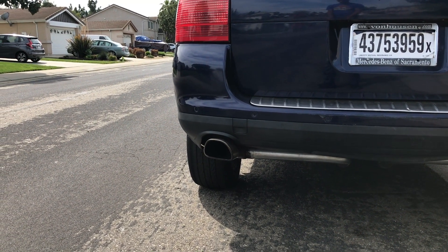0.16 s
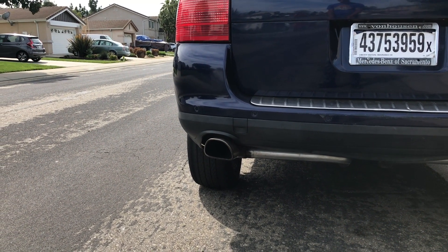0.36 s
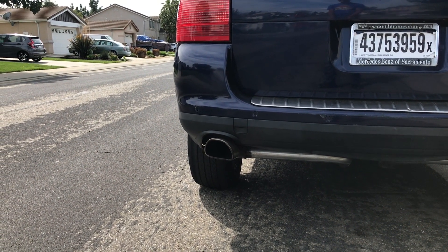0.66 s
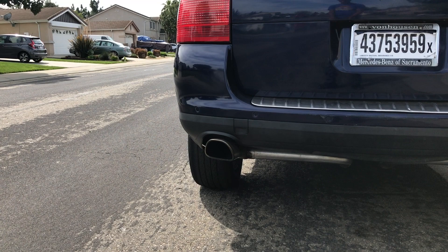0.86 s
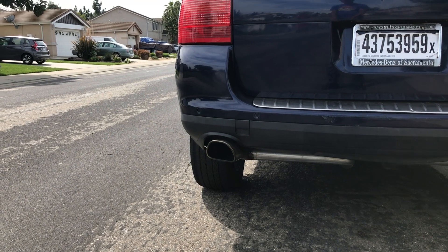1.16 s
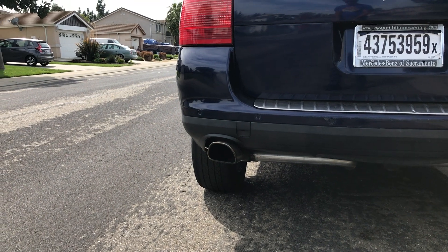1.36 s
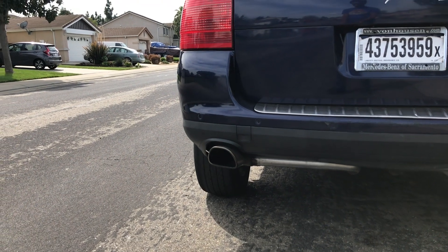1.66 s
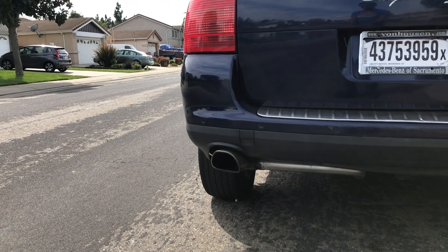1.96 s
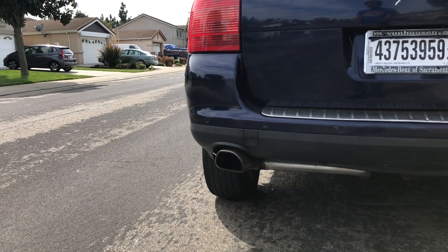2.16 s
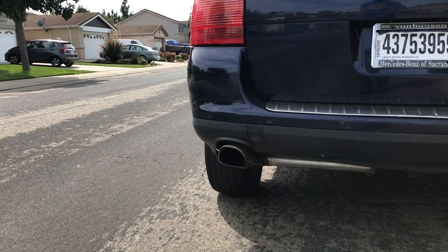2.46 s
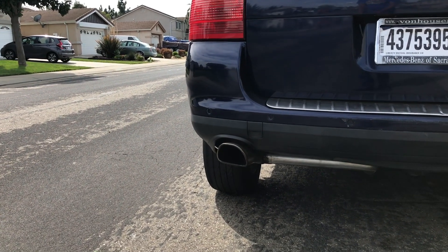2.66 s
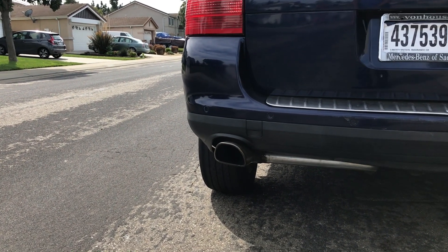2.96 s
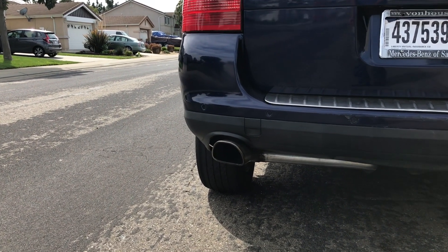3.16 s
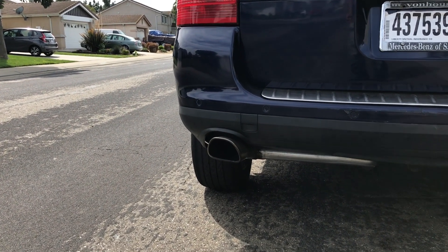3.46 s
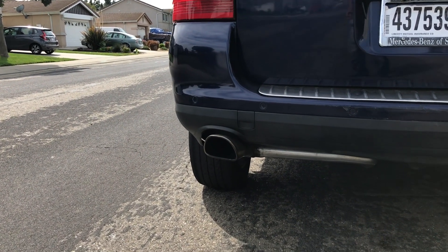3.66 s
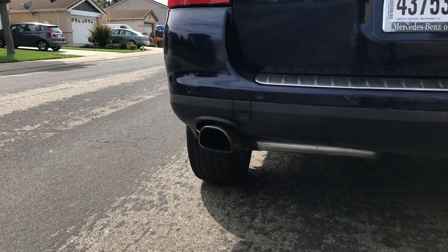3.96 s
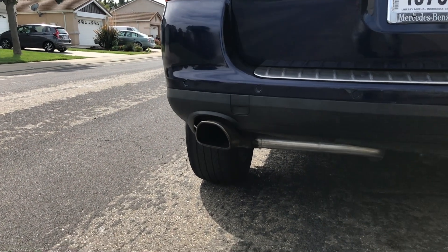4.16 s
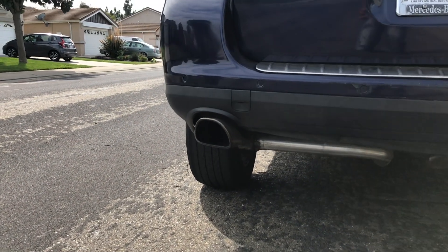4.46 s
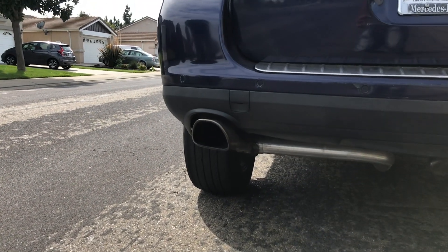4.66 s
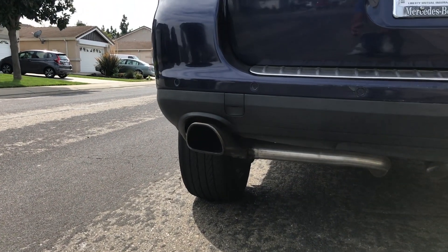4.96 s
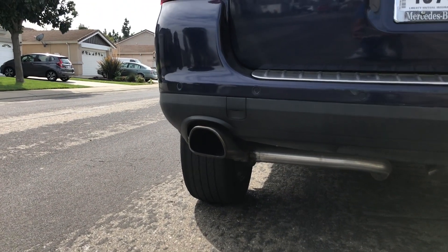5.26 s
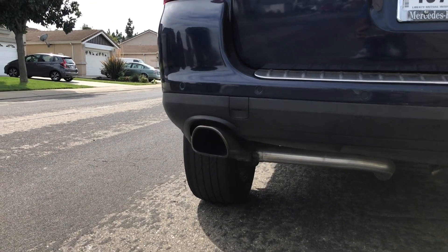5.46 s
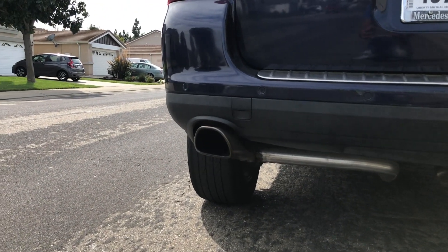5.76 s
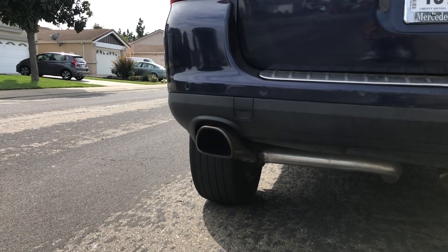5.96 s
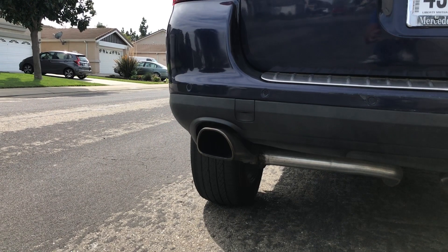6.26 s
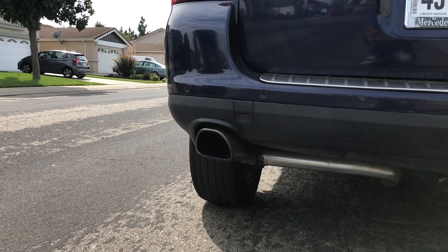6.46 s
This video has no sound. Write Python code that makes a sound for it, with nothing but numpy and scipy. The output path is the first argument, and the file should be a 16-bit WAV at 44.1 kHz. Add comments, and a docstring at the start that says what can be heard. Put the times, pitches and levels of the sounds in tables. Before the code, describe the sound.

A V8 with an open exhaust idles close to the microphone on a quiet street: a deep, uneven burbling drone, soft chuffing, engine-bay rush and ticking, and a thin high pump whine. A tiny air puff comes at 0.3 s. From 1.0 s the engine is revved, the drone climbing through booming pipe resonances into a hard metallic rasp, peaking near 1.8 s with a cluster of pops. It falls gradually, burbling, to a low rumble by 3.4 s. At 4.2 s a brief gust of gas begins a second, quicker rev, with a puff at 4.4 s. It peaks higher around 5.0-5.1 s, with thick crackling afterfires and loud bangs, then drops, hangs briefly at 5.6 s and slides down toward idle by 6.6 s. The microphone moves closer from about 4 s, making the final rasp and hiss more direct. Only a short, faint echo from houses.

```python
"""A V8 with an open exhaust idles and is revved twice, heard from just behind the tailpipe on a quiet street.
Even firing makes a deep drone that swells in the pipe's resonances; unequal cylinders make the pipe burble.
With speed and load the pulse fronts steepen into a rasp, and afterfires pop mostly around the two rev peaks.
Under this lie turbulent gas hiss, the rush and ticking of the engine bay, a thin pump whine and two air puffs.
Shaft speed sets the pace of the firings; speed and throttle load set the engine and exhaust levels."""
import sys
import numpy as np
from scipy import signal
from scipy.fft import rfft, irfft, next_fast_len
from scipy.io import wavfile
from scipy.ndimage import uniform_filter1d, minimum_filter1d, map_coordinates

SR = 44100
rng = np.random.default_rng(int(sys.argv[2]) if len(sys.argv) > 2 else 0)


def write(x):
    x = np.atleast_2d(x).T
    wavfile.write(sys.argv[1], SR, np.round(np.clip(x, -1, 1) * 32767).astype(np.int16))

N = 291060


def amp(db):
    """Logarithmic level: decibels to amplitude gain."""
    return 10 ** (np.asarray(db) / 20)


def unit(x):
    """Power normalisation: scale to rms 1."""
    return x / np.sqrt(np.mean(x ** 2) + 1e-20)


def steady(x, seconds):
    """Short-time power normalisation: scale to a running rms of 1."""
    size = int(seconds * SR)
    power = uniform_filter1d(uniform_filter1d(x ** 2, size), size)
    return x / np.sqrt(np.abs(power) + 1e-12)


def along(points, hz):
    """Logarithmic frequency scale: read (Hz, value) points at the given frequencies."""
    point_hz, values = np.transpose(points)
    return np.interp(np.log(hz + 1), np.log(point_hz + 1), values)


def curves(rows):
    """Linear interpolation in time: one curve for each column after the seconds."""
    s, *columns = np.transpose(rows)
    return [np.interp(np.arange(N) / SR, s, column) for column in columns]


def wobble(rate):
    """Band-limited random fluctuation: a smooth curve through rate random knots a second."""
    steps = np.linspace(0, N * rate / SR, 4096)
    path = map_coordinates(rng.standard_normal(int(steps[-1]) + 4), [steps])
    return np.interp(np.arange(N) * rate / SR, steps, path)


def swell(s, width):
    """Gaussian envelope: a bell-shaped swell that peaks at 1."""
    return np.exp(-.5 * ((np.arange(N) / SR - s) / width) ** 2)


def filtered(x, response):
    """Linear filtering: multiply the spectrum by a complex response of frequency."""
    size = next_fast_len(N + SR // 2)
    hz = np.fft.rfftfreq(size, 1 / SR)
    return irfft(rfft(x, size) * response(hz), size)[:N]


def noise(colour):
    """Spectral shaping of white noise, scaled to rms 1."""
    return unit(filtered(rng.standard_normal(N), lambda hz: amp(along(colour, hz))))


def ring(x, colour, size=4096):
    """Minimum-phase filtering: a causal response of this colour, whose impulse response peaks at 1."""
    hz = np.fft.rfftfreq(size, 1 / SR)
    cepstrum = irfft(np.log(amp(along(colour, hz)) + 1e-6))
    # folding the cepstrum onto positive time makes the response causal
    cepstrum[1:size // 2] *= 2
    cepstrum[size // 2 + 1:] = 0
    response = irfft(np.exp(rfft(cepstrum)))
    return signal.fftconvolve(x, response / np.abs(response).max())[:N]


def impulses(at, sizes):
    """Impulsive excitation: single-sample kicks at the given samples."""
    return np.bincount(np.clip(at, 0, N - 1).astype(int), sizes, N)


def bursts(kicks, front_s, tail_db=-9, tail_s=.014):
    """Decaying turbulence: every kick starts a fresh noise spurt, with a weak tail from under the car."""
    t = np.arange(SR // 10) / SR
    shape = np.exp(-2 * t / front_s) + amp(tail_db) ** 2 * np.exp(-2 * t / tail_s)
    power = signal.fftconvolve(kicks ** 2, shape / shape.sum())[:N]
    return np.sqrt(np.abs(power)) * rng.standard_normal(N)


# Shaft speed as firing rate, eight firings to an engine cycle. Each row: time in seconds, rate in Hz.
FIRING_SPEED = [(0, 41.52), (.45, 38.57), (.95, 37.2), (1.22, 45.3), (1.38, 62.05), (1.6, 83.23),
                (1.76, 102.2), (2.02, 90.7), (2.4, 74.27), (2.75, 59.1), (3.42, 41.98), (4.21, 47.16),
                (4.5, 61.53), (4.79, 88.8), (4.91, 110.4), (4.99, 121.8), (5.17, 121), (5.51, 84.74),
                (5.68, 82.52), (6.1, 66.07), (6.6, 49.89)]


def firing_rate():
    """Periodicity: the shaft speed fixes the number of firings a second."""
    return curves(FIRING_SPEED)[0]


def firings(cycles):
    """Valve timing: the samples at which an exhaust valve opens, one per whole cycle."""
    return np.flatnonzero(np.diff(np.floor(cycles)))


def throb(cycles, depth):
    """Amplitude modulation: a gain that peaks just after every firing."""
    return unit(np.exp(depth * np.cos(2 * np.pi * cycles - 1)))


# Throttle moves: two blips, smaller openings that catch the falling revs, and easings below idle.
# Each row: start in seconds, rise in seconds, end of hold in seconds, fall in seconds,
# load (0 idle to 1 full).
THROTTLE_MOVES = [(0.399, 0.21, 0.98, 0.044, -0.34), (1.021, 0.33, 1.905, 0.35, 0.94),
                  (2.08, 0.53, 2.847, 0.1, 0.46), (4.22, 0.37, 5.062, .18, 0.92),
                  (5.4, .15, 6.47, 0.11, -0.36), (5.83, 0.34, 6.354, 0.14, 0.71)]


def load(lag_s):
    """Superposition of throttle moves: each ramps in, holds and ramps out."""
    t = np.arange(N) / SR - lag_s
    total = 0
    for start, rise, end, fall, depth in THROTTLE_MOVES:
        opening = np.minimum((t - start) / rise, 1 - (t - end) / fall)
        total = total + depth * np.clip(opening, 0, 1)
    return total


IDLE_HZ = 40  # reference firing rate of every level law


def level(law, lag_s=0):
    """Power law of speed: a layer's dB is linear in octaves of speed and in load."""
    idle_db, octave_db, load_db = law
    octaves = np.log2(firing_rate() / IDLE_HZ)
    return idle_db + octave_db * octaves + load_db * load(lag_s)


# How strongly the exhaust carries a steady tone. Each row: frequency in Hz, gain in dB.
PIPE_BOOM = [(40, -43.5), (44, -28), (49, -21), (58, -29), (68, -29), (75, -23.5), (83, -15.5), (94, -20),
             (105, -13.5), (122, -26.5), (142, -13.5), (165, -21.5), (192, -13.5), (205, -19.5),
             (240, -24.5)]


def boom(multiple, law, build_s=0.02):
    """Resonance: dB of a multiple of the firing rate as it sweeps through the exhaust's modes."""
    response_db = along(PIPE_BOOM, multiple * firing_rate())
    return uniform_filter1d(response_db, int(build_s * SR)) + level(law)


# Level of the firing tone over the boom: dB at idle, dB per octave of speed, dB added at full load.
FIRING_TONE_LAW = (0, 0, 8.37)
# Level of its octave over the boom, in the same columns and units.
FIRING_OCTAVE_LAW = (-7, -4.5, 7.6)


def drone(cycles, waver_db=-0.7):
    """Harmonic series: the even part of the pulse train, as the firing tone and its octave."""
    first_db = boom(0.99, FIRING_TONE_LAW) + waver_db * wobble(22)
    second_db = boom(2.038, FIRING_OCTAVE_LAW) + waver_db * wobble(24)
    first = amp(first_db) * np.sin(2 * np.pi * cycles)
    second = amp(second_db) * np.sin(4 * np.pi * cycles)
    return np.sqrt(2) * (first + second)


# Unequal cylinders: the relative dB of each multiple of the cycle rate, repeating every eight.
CYLINDER_PATTERN = [4, -7, 4.5, 8, -9, -6, 8, 3.5]
# Standing waves of the whole exhaust. Each row: frequency in Hz, width in Hz, relative level in dB.
PIPE_MODES = [(51.75, 3.93, 3.5), (84.6, 12.8, 1), (104.7, 14.9, 3), (144.3, 6.9, 4), (157.8, 13.1, -4.5),
              (183.7, 10.06, 1), (234.3, 5.74, -8), (268.5, 21.5, -15), (307.5, 30, -22), (337.6, 3.9, -14),
              (415.7, 11, -22), (439, 29, -30), (503.7, 26, -25)]
# Burble level: dB at idle, dB per octave of speed, dB added at full load.
BURBLE_LEVEL = (-26, -0.42, 11.24)


def muffler(f):
    """Modal superposition: standing waves of alternating sign between about 40 and 580 Hz."""
    pipe = 0
    for k, (centre, width, db) in enumerate(PIPE_MODES):
        damping = 1j * f * width
        pipe = pipe + (-1) ** k * amp(db) * damping / (centre * centre - f * f + damping)
    return pipe / np.sqrt((1 + (40 / (f + 1)) ** 10) * (1 + (f / 580) ** 10))


def burble(cycles, unsteady_db=1.54, scatter=0.2, open_db=10, count=48):
    """Subharmonics: unequal cylinders ring the pipe, whose upper modes open up with the revs."""
    lines = np.zeros(N)
    for order in range(3, count):
        if order not in (8, 16):  # the drone holds the firing tone and its octave
            gain = amp(CYLINDER_PATTERN[order % len(CYLINDER_PATTERN)] + unsteady_db * wobble(11))
            turns = order * cycles / len(CYLINDER_PATTERN) + rng.random()
            lines += gain * np.sin(2 * np.pi * turns)
    # unsteady combustion: no two explosions are equally strong
    at = firings(cycles)
    uneven = impulses(at, rng.standard_normal(len(at)))
    gas = unit(filtered(lines, muffler)) + scatter * unit(filtered(uneven, muffler))
    upper = filtered(gas, lambda f: 1 - 1 / (1 + (f / 240) ** 10))
    opening = amp(open_db * np.log2(firing_rate() / 55))
    gas = gas + upper * (opening - 1)
    return amp(level(BURBLE_LEVEL)) * steady(gas, 0.067)


# Ringing of the short tailpipe. Each row: frequency in Hz, relative level in dB, t60 in seconds.
TAILPIPE_MODES = [(1060, 12, 0.0039), (1590, -3, 0.01), (1934, -2.5, 0.0077), (2660, -5, 0.031),
                  (3424, -8, 0.031), (4550, -10, 0.0022), (5580, -13.5, 0.0069)]


def clang(at, sizes, scatter_db=4, attack_s=0.00014):
    """Modal excitation: every shock rings the tailpipe's modes at new strengths."""
    t = np.arange(SR // 25) / SR
    out = np.zeros(N)
    for hz, db, t60 in TAILPIPE_MODES:
        envelope = amp(db - 60 * t / t60) * (1 - np.exp(-t / attack_s))
        mode = np.sin(2 * np.pi * hz * t) * envelope
        kicks = impulses(at, sizes * amp(scatter_db * rng.standard_normal(len(at))))
        out += signal.fftconvolve(kicks, mode)[:N]
    return out


# Colours of the tailpipe's low bark and sharp crack.
# Each row: frequency in Hz, relative level in dB per Hz.
BARK_COLOUR = [(120, -27), (330, 2), (480, -2), (600, -4.5), (680, 1.5), (740, -5), (850, 5.5), (915, 3),
               (980, 3), (1200, -8), (1420, -34), (1880, -10), (2300, -30), (6000, -67)]
CRACK_COLOUR = [(900, -27.5), (1400, -17.5), (1900, 14), (2300, -2), (2750, -1.5), (3080, -4),
                (3450, -10.5), (4100, -4), (5700, -20), (7500, -33), (15000, -50)]
# Levels of bark, crack and low-rev chuffing: dB at idle, dB per octave of speed, dB added at full load.
BARK_LEVEL = (-78.5, 26.4, 14)
CRACK_LEVEL = (-75.5, 13.3, 21.9)
SPUTTER_LEVEL = (-60.5, 0.59, 2.4)
BARK_LAG_S = 0.045  # the bark builds and dies a little behind the throttle
SPUTTER_LAG_S = .15  # the chuffing lingers longer


def rasp(cycles, scatter_db=2.5, jitter_s=.0002, clean=0.12, spurt_db=-3, sputter_crack_db=-8):
    """Nonlinear steepening: each pulse front becomes a small shock with turbulence behind it."""
    at = firings(cycles)
    size, delay = rng.standard_normal((len(at), 2)).T
    at, sizes = at + jitter_s * SR * delay, amp(scatter_db * size)
    shocks = impulses(at, sizes)
    low_spurts = bursts(shocks, front_s=.004)
    high_spurts = bursts(shocks, front_s=.003)
    bark = ring(clean * shocks + low_spurts, BARK_COLOUR)
    crack = unit(clang(at, sizes)) + amp(spurt_db) * unit(ring(high_spurts, CRACK_COLOUR))
    # soft chuffing that remains at low revs
    sputter = amp(level(SPUTTER_LEVEL, SPUTTER_LAG_S))
    bark_gain = amp(level(BARK_LEVEL, BARK_LAG_S)) + sputter
    crack_gain = amp(level(CRACK_LEVEL)) + amp(sputter_crack_db) * sputter
    return bark_gain * steady(bark, 0.045) + crack_gain * steady(crack, 0.046)


# Gas leaving the tip. Each row: frequency in Hz, relative level in dB per Hz.
GAS_COLOUR = [(500, -26.5), (900, 4), (1400, 8.5), (1900, 16), (3500, 11), (5500, 11), (7300, 1.5),
              (9300, 3.5), (10300, -5), (11500, 2.5), (15800, -0.5)]
# Hiss level: dB at idle, dB per octave of speed, dB added at full load.
HISS_LEVEL = (-69.5, 5.2, 4.9)
# Brief gusts from the tip as the engine takes up load.
# Each row: time in seconds, rise over the steady hiss in dB, width in seconds.
GAS_GUSTS = [(1.3, 3.5, .025), (4.2, 11.5, 0.025)]
HISS_PER_DRONE = 0.62  # dB of hiss for each dB that the drone swings the gas in the tip


def hiss(cycles):
    """Modulated jet noise: gas leaves the tip in puffs, harder when the pipe booms."""
    swing_db = boom(0.96, FIRING_TONE_LAW)
    flow_db = level(HISS_LEVEL) + HISS_PER_DRONE * (swing_db - swing_db.mean())
    flow_db = flow_db + sum(db * swell(s, width) for s, db, width in GAS_GUSTS)
    return amp(flow_db) * noise(GAS_COLOUR) * throb(cycles, depth=0.1) * amp(1.5 * wobble(35))


# Rush and clatter of the engine bay. Each row: frequency in Hz, relative level in dB per Hz.
ENGINE_BAY_COLOUR = [(200, 1), (300, 6), (400, -1.5), (550, -6.5), (680, -0.5), (950, -2), (1250, -6.5),
                     (1800, -10), (2300, -14.5), (2850, -13.5), (4300, -17.5), (6000, -24), (7500, -29),
                     (15800, -33)]
# Engine bay level: dB at idle, dB per octave of speed, dB added at full load.
BAY_LEVEL = (-46.5, -3.3, 4.14)


def bay(cycles, tick_db=-8, scatter_db=4):
    """Broadband and impact noise: belts and fan rush; valves and injectors tick twice a firing."""
    at = firings(2 * cycles)
    kicks = impulses(at, amp(scatter_db * rng.standard_normal(len(at))))
    ticks = unit(ring(kicks, ENGINE_BAY_COLOUR))
    rush = noise(ENGINE_BAY_COLOUR) * throb(cycles, depth=0.028) * amp(0.97 * wobble(25))
    return amp(level(BAY_LEVEL)) * (rush + amp(tick_db) * ticks)


# Echoes of the engine bay between road and floor pan. Each row: delay in seconds, gain.
UNDERBODY_ECHOES = [(.0053, 0.17), (.0087, 0.22), (0.013, 0.22), (.0211, 0.17)]


def under_car(x):
    """Multipath interference: sound from the front arrives under the car with a few close echoes."""
    power = 1 + sum(gain ** 2 for delay, gain in UNDERBODY_ECHOES)

    def paths(hz):
        """Phase delay: the direct path and its delayed copies."""
        echoes = sum(gain * np.exp(-2j * np.pi * hz * delay) for delay, gain in UNDERBODY_ECHOES)
        return (1 + echoes) / np.sqrt(power)
    return filtered(x, paths)


# Pump whine, running up to its working speed. Each row: time in seconds, mean frequency in Hz,
# mean level in dB.
PUMP_WHINE = [(0, 4490, -60), (.3, 4620, -71), (.52, 4750, -63), (.8, 4700, -73), (.92, 4894, -60.5),
              (1.3, 4910, -61), (2.5, 4945, -80.5), (2.95, 4948, -65.5), (4.3, 4938, -63.5),
              (5.8, 4880, -87.5), (6.6, 4980, -62)]


def whine(octave_db=-17):
    """Frequency modulation: a thin, slightly unsteady pump tone with its octave."""
    hz, db = curves(PUMP_WHINE)
    phase = 2 * np.pi * np.cumsum(hz + 5 * wobble(40)) / SR
    tone = np.sin(phase) + amp(octave_db) * np.sin(2 * phase)
    return amp(db + 1.8 * wobble(14)) * tone


# Short puffs of air at the throttle. Each row: time in seconds, level in dB, width in seconds.
AIR_PUFFS = [(.29, -53, 0.031), (4.43, -53, 0.028)]


def puffs():
    """Narrow-band turbulence: brief hisses of intake air."""
    gain = sum(amp(db) * swell(s, width) for s, db, width in AIR_PUFFS)
    # frequency in Hz, relative level in dB per Hz
    colour = [(2000, -37), (3100, -6.5), (3800, 10.5), (4400, -4.5), (6000, -32.5)]
    return gain * noise(colour)


# Unburnt fuel popping in the pipe. Each row: time in seconds, then the relative peak levels in dB
# of the low bark, the bang and the high ping.
AFTERFIRES = [(1.768, -21.5, -16.5, -15), (1.777, -23.5, -25.5, -16), (1.785, -8.5, -11.5, -11),
              (1.796, -6.5, -16, -18), (1.816, -20.5, -15, -13.5), (1.865, -19, -28, -17.5),
              (1.941, -12, -28, -26), (2.037, -20.5, -32, -31.5), (3.026, -25, -45, -48),
              (4.026, -31.5, -36, -36.5), (4.858, -16, -16.5, -20.5), (4.913, -20.5, -11, -22),
              (4.956, -9, -17.5, -25), (4.975, -4.5, -16.5, -22), (5.012, -11.5, -2, -16.5),
              (5.046, -8, -15, -21), (5.071, -6.5, -8, -20), (5.086, 0, -13, -26.5), (5.104, -3, 1.5, -9),
              (5.111, -3.5, 1, -11.5), (5.152, -9.5, -27, -32), (5.319, -21, -27.5, -35.5)]
# Colours of an afterfire's crack and of the tip's high ring.
# Each row: frequency in Hz, relative level in dB per Hz.
BANG_COLOUR = [(700, -4), (1250, 10), (1400, 2), (1850, 1), (2250, -1.5), (2750, -3), (3500, -13.5),
               (4200, -30), (5700, -36.5), (7500, -52), (15000, -68.5)]
PING_COLOUR = [(1500, -34), (2250, -10.5), (2800, 2.5), (3150, -5.5), (3500, -5), (4300, -12), (5700, -17),
               (9000, -41.5)]
# The note that a bang leaves in the tailpipe: frequency in Hz, t60 in seconds, relative level in dB.
BANG_NOTE = (930, 0.033, -5)
POP_DB = -3  # afterfires against the rest of the exhaust


def pops(rough=0.84, spurt=0.45):
    """Shock excitation: each afterfire barks low, bangs the tailpipe and pings, with some turbulence."""
    s, *sizes_db = np.transpose(AFTERFIRES)
    push, front, edge = (impulses(s * SR, amp(db + POP_DB)) for db in sizes_db)
    hz, t60, db = BANG_NOTE
    t = np.arange(SR // 20) / SR
    decay = amp(db - 60 * t / t60)
    note = signal.fftconvolve(front, decay * np.sin(2 * np.pi * hz * t))[:N]
    bark = ring(push + rough * bursts(push, front_s=0.018), BARK_COLOUR)
    bang = ring(front + spurt * bursts(front, front_s=0.0025), BANG_COLOUR)
    ping = ring(edge + bursts(edge, front_s=0.002), PING_COLOUR)
    return bark + bang + note + ping


# Decay of the street's reverberation. Each row: frequency in Hz, t60 in seconds.
STREET_DECAY = [(100, 0.14), (1000, 0.098), (4000, 0.11), (12000, 0.33)]


def surroundings(x, wet_db=-18):
    """Reverberation: the houses give a faint answer, a decaying noise tail."""
    hz, t, spectrum = signal.stft(rng.standard_normal(SR // 2), SR, nperseg=256)
    decay = amp(-60 * t / along(STREET_DECAY, hz)[:, None])
    tail = signal.istft(spectrum * decay, SR, nperseg=256)[1]
    return x + amp(wet_db) * signal.fftconvolve(x, tail / np.linalg.norm(tail))[:N]


# The microphone moves nearer to the tailpipe and into its beam. Each row: time in seconds,
# gain in dB for the low notes, gain in dB for rasp, pops and hiss.
APPROACH = [(3.7, -0.24, -0.33), (4.7, 1.2, 1.4), (5.5, 2.2, -0.5), (6.4, 0.6, 6.5)]


def scene():
    """Superposition: one shaft speed and one throttle drive the engine; distance and beam set its gains."""
    cycles = np.cumsum(firing_rate()) / SR  # firing cycles so far
    low_db, beam_db = curves(APPROACH)
    low_notes = drone(cycles) + burble(cycles)
    beamed = surroundings(rasp(cycles) + pops()) + hiss(cycles)
    exhaust = amp(low_db) * low_notes + amp(beam_db) * beamed
    return (exhaust + under_car(bay(cycles)) + whine() + puffs())[None]


TOP_HZ = 15750  # band limit


def record(dry, ceiling=0.94, hold_s=0.0017):
    """Peak limiting and band limiting: a fast gain holds down the peaks, then the top is cut."""
    size = 2 * int(hold_s * SR / 2) + 1
    needed = np.minimum(1, ceiling / (np.abs(dry[0]) + 1e-9))
    gain = uniform_filter1d(minimum_filter1d(needed, size), size)
    return filtered(dry[0] * gain, lambda hz: hz < TOP_HZ)[None]


dry = scene()
out = record(dry)
write(out)
```